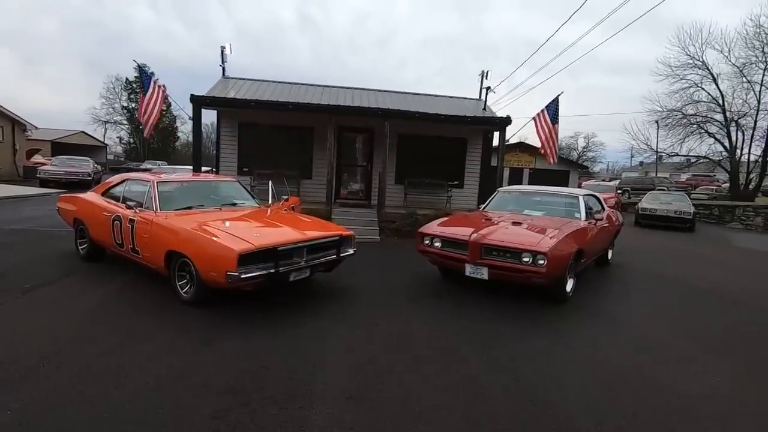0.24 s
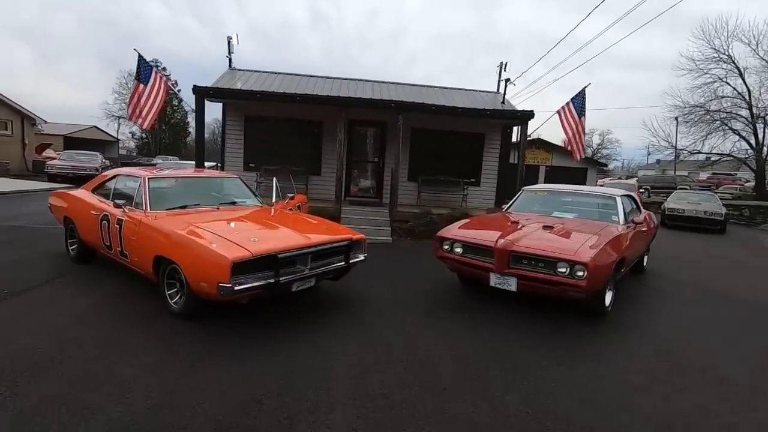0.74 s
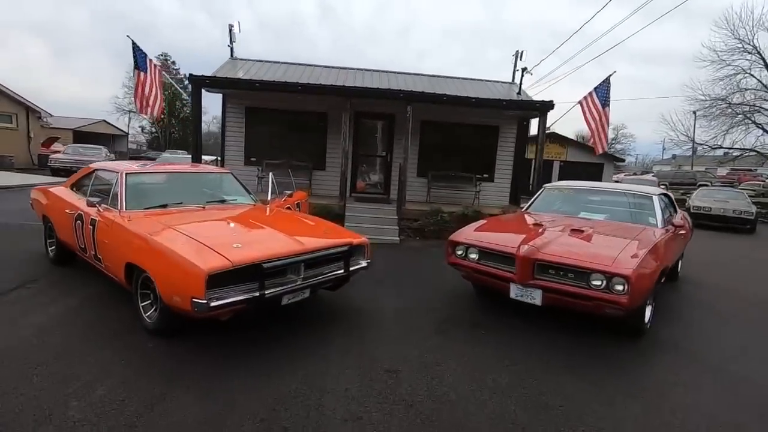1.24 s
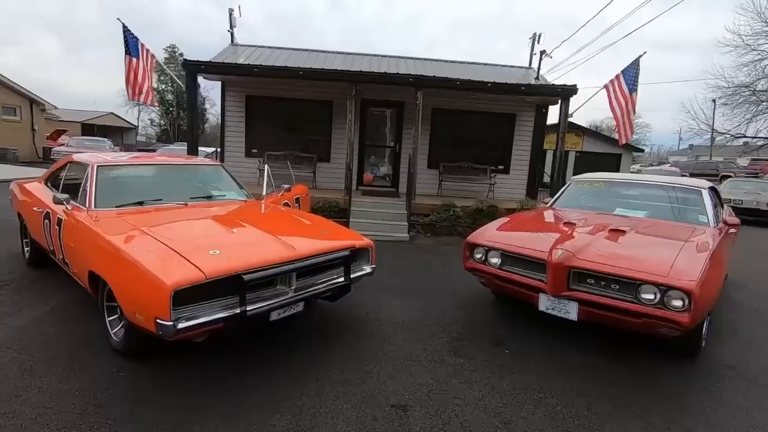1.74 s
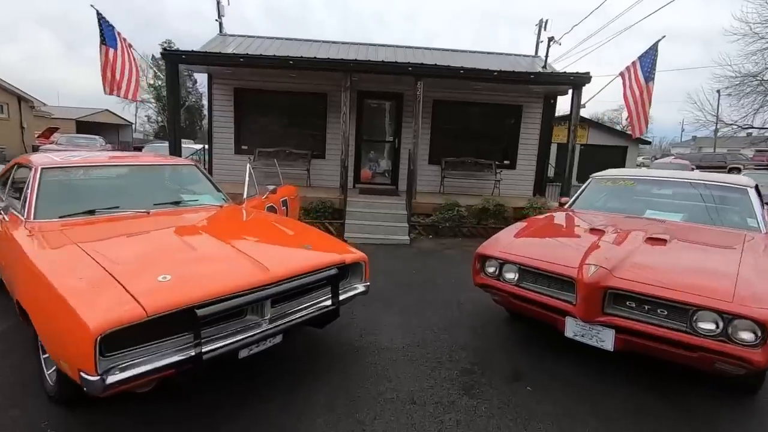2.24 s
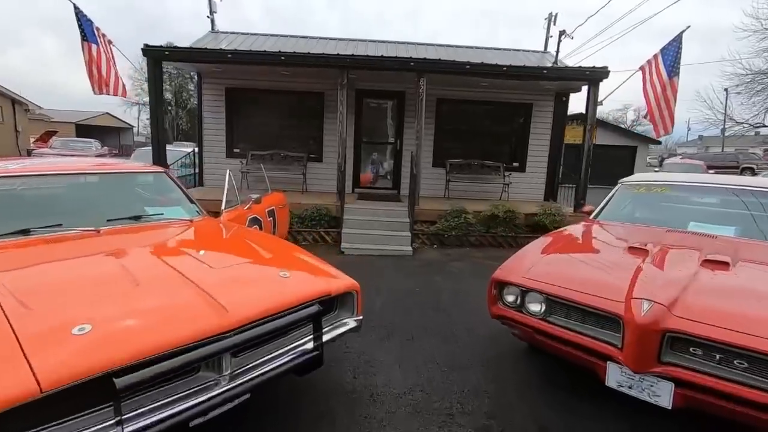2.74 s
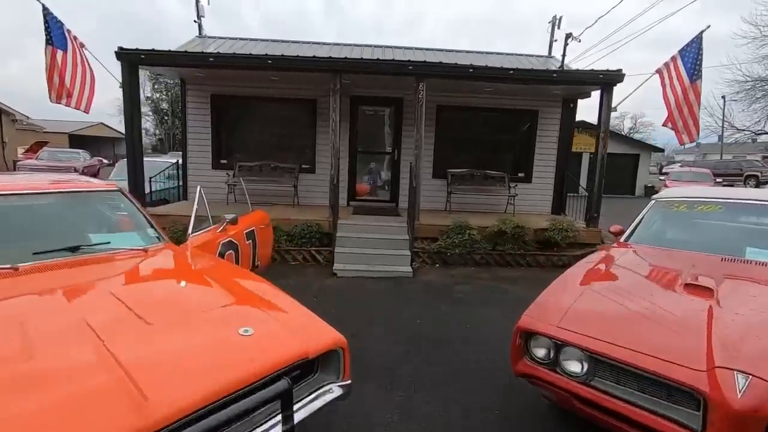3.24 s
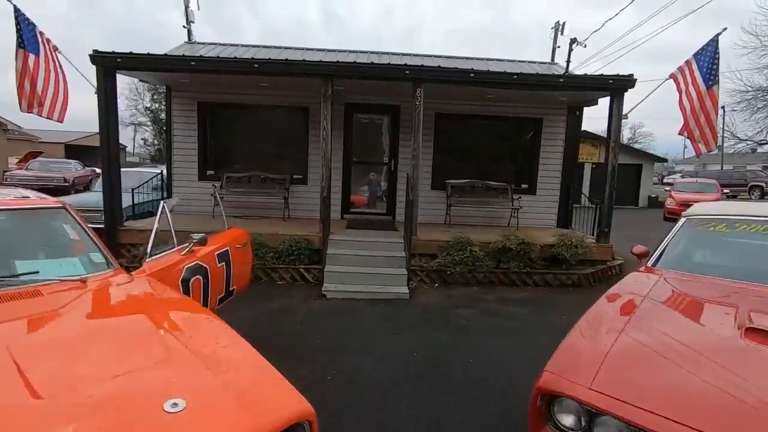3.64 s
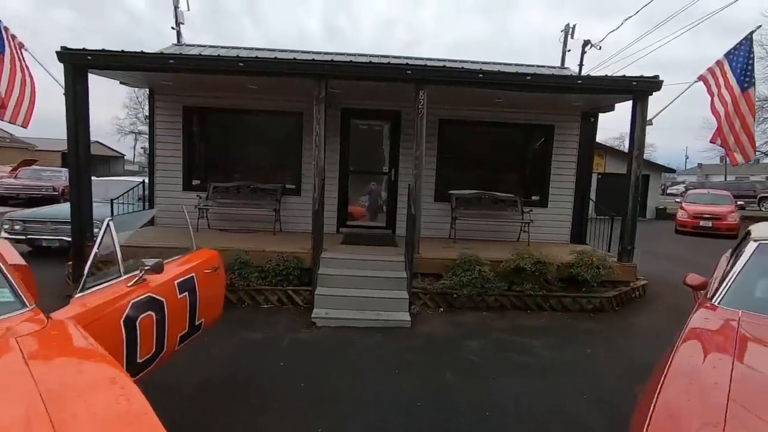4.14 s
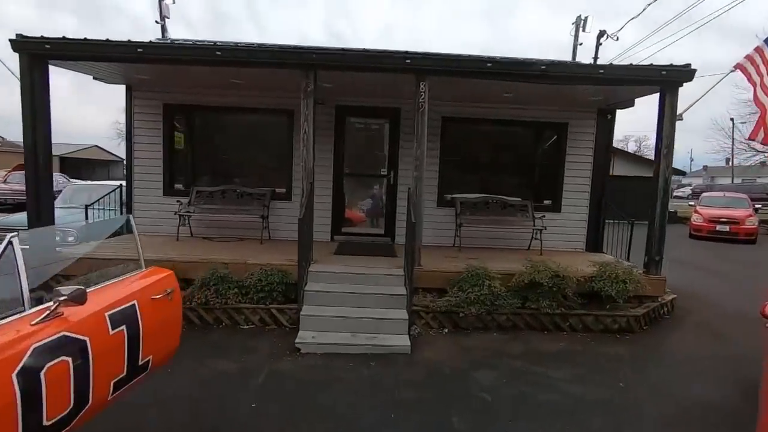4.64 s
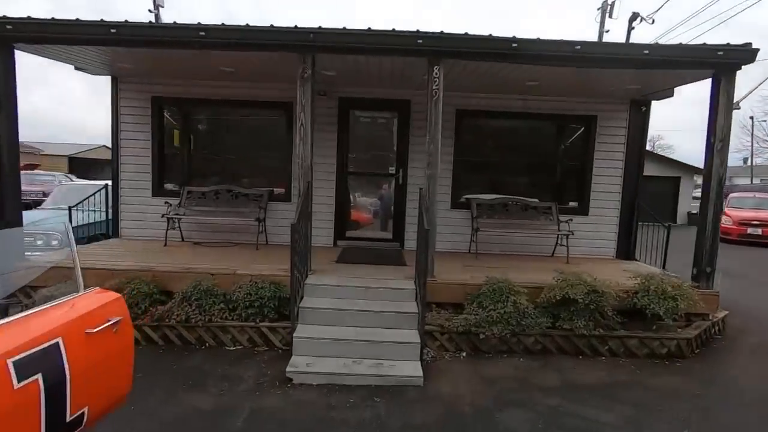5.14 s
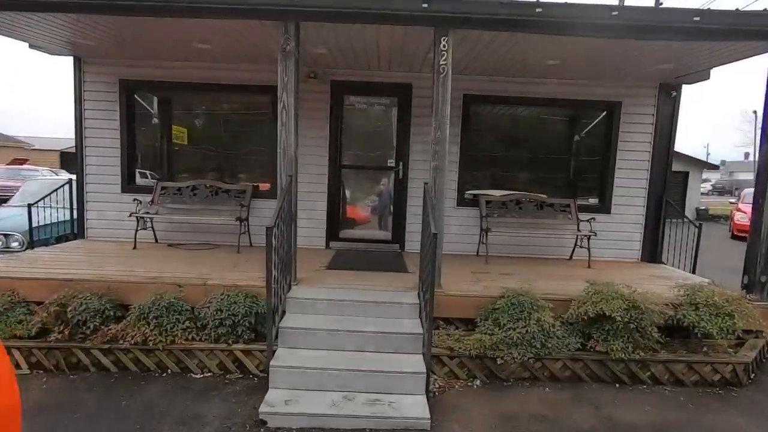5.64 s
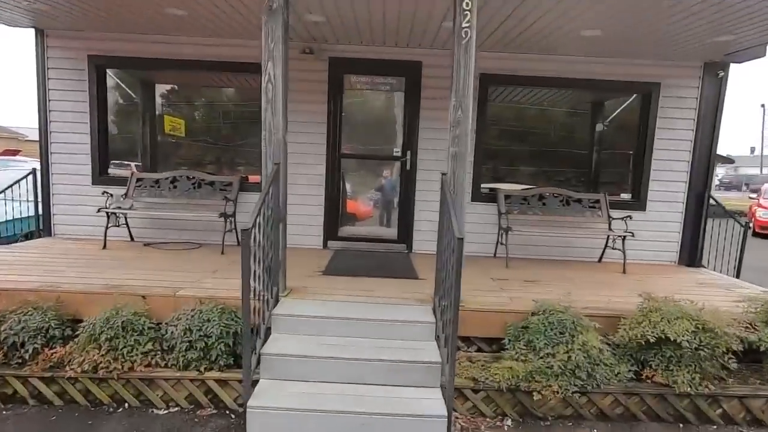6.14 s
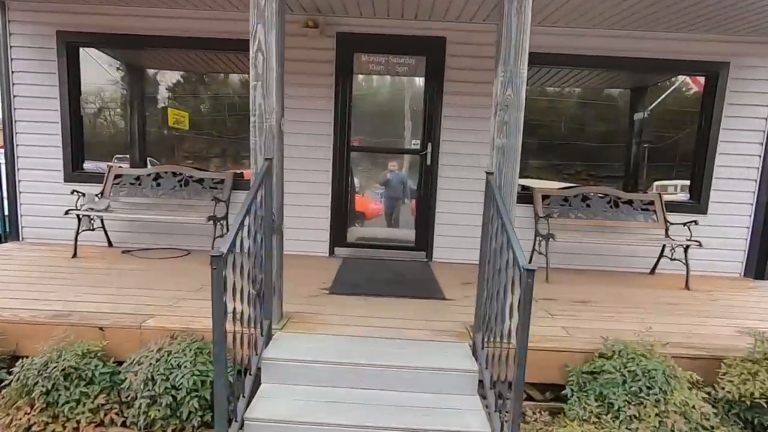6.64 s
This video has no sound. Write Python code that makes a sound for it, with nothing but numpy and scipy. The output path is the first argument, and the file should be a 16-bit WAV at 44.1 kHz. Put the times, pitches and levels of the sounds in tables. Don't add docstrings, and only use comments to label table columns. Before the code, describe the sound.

Outdoors, a powerful car engine holds a low, bumpy idle without revving. The exhaust is a heavy, centered drone with irregular stronger and weaker beats, while quiet airy fan and valve noise hisses to both sides. It thins briefly near the start, then swells, with extra pipe ringing midway between two parked cars. Faint clicks, squeaks and distant hum; close handheld stereo pickup.

```python
import sys
import numpy as np
from scipy import signal
from scipy.io import wavfile
from scipy.ndimage import uniform_filter1d

SR = 44100
rng = np.random.default_rng(int(sys.argv[2]) if len(sys.argv) > 2 else 0)


def decibels_to_gain(level_db):
    exponent = np.asarray(level_db, float) / 20
    return 10 ** exponent


def dump(signal):
    limited = np.clip(np.atleast_2d(signal).T, -1, 1)
    pcm = np.round(limited * 32767).astype(np.int16)
    wavfile.write(sys.argv[1], SR, pcm)


N = 303849

# time in seconds, firings per second.
IDLE_SPEED = [(0, 42.9), (.74, 42.71), (.816, 43.77), (1.386, 40.24), (2.28, 41.58), (2.29, 42.25),
              (2.897, 42.57), (2.925, 41.69), (3.43, 42.16), (3.45, 42.7), (3.603, 43.04), (3.967, 45.45),
              (4.456, 42.36), (4.687, 43.54), (5.768, 43.24), (5.791, 42.32), (5.991, 42.73), (6.89, 42.13)]
# time in seconds, exhaust level in dB, detour of the echo off car
# and wall in metres, echo strength 0-1, unevenness of the firings in dB.
WALK = [(0, -25.5, 1.6, 0, 3), (.45, -22.5, 2.5, 0.4, 0.5), (.85, -21.5, 2.35, 0.28, 0.5),
        (1.07, -24, 2.76, 0.85, -5), (1.15, -27.5, 1.24, 0.35, -3.5), (1.55, -29, 1.29, 0.5, 5),
        (1.95, -28, 0.84, 0.38, 3.5), (2.3, -22.5, 2.36, 0.3, 2.5), (2.7, -23, 2.52, 1, 2.5),
        (3.1, -23, 2.51, 0.32, 1), (3.5, -21, 2.54, 0.57, 1), (3.85, -21, 2.38, 0.88, 3.5),
        (4.3, -22, 2.67, 0.4, -0.5), (4.8, -22, 3.14, 0.45, -5), (5.2, -23.5, 3.36, 0.41, -7),
        (5.7, -24.5, 4.05, 0.37, -4), (6.3, -22.5, 4.03, 0.17, -1), (6.89, -23.5, 4.07, 0.45, -3.5)]
# time in seconds, level in dB, brightness in dB per group,
# stereo width 0-1.
NEARNESS = [(0, -49, 0.5, 0.7), (.35, -49, 0.1, .6), (.75, -48, 1, .6), (1.1, -47.5, -0.5, .5),
            (1.5, -46, .3, .4), (1.9, -45.5, 0, 0.5), (2.3, -45.5, 0.1, 0.3), (2.75, -47, 0.66, .4),
            (3.2, -47, .5, 0.5), (3.7, -49, 1, .7), (4.2, -49.5, 1, 0.8), (4.55, -47.5, -0.6, 0.5),
            (5.0, -51, -1, 0.5), (5.3, -50, -0.5, 0.4), (5.9, -49, 0.1, 0.6), (6.3, -53, 1, 0.5),
            (6.89, -53, 1.5, 0.7)]
# time in seconds, pitch in Hz, level in dB.
FAR_HUM = [(0, 484, -64), (.4, 484, -66), (.5, 484, -58), (.65, 483, -63), (1.4, 476, -61),
           (1.55, 476, -70), (1.7, 478, -60), (2.3, 478, -80), (6.89, 478, -80)]
# time in seconds, pitch in Hz, peak in dB, length in seconds.
SQUEAKS = [
    (.341, 900, -31, 0.001),
    (1.7125, 3550, -40, 0.0025),
    (6.083, 5370, -59, .005),
    (6.217, 5430, -59, .008),
    (6.221, 4220, -56, 0.006),
]
# time in seconds, peak in dB.
TICKS = [
    (1.4426, -32.5),
    (1.4504, -39),
    (1.464, -50),
    (4.352, -49),
]
# frequency in Hz, level in dB per Hz.
BAY_COLOUR = [(330, -11), (400, -11), (520, -10), (720, -6), (860, -10.5), (1500, -12.5), (1850, -18),
              (4760, -28.5), (7900, -34.5), (8750, -38), (9800, -37), (10800, -51.5), (11800, -52),
              (14000, -54)]
# frequency in Hz, likeness 0-1.
LIKENESS = [(330, 0.97), (420, 0.93), (600, 0.81), (1100, 0.4), (2400, 0.58), (3500, 0.8), (4800, 0.66),
            (5600, 0.39), (7500, 0.074), (10500, 0.16)]
# frequency in Hz, left minus right in dB.
LEAN = [(330, -0.5), (600, 0.4), (1050, -2.5), (1900, -0.3), (3300, 1), (5000, -0.5), (6000, -2),
        (10400, 0)]
# dB against the bay level, for drone, roar, rush and sizzle.
GROUP_DB = [0.9, -0.9, -4, -13.5]
# time in seconds, half length in seconds,
# gain in dB.
FAN_ROAR = [
    (.6, 1, 3),
    (2.7, 0.74, -2),
    (3.55, 0.25, 3.5),
    (4.0, 0.38, 4.5),
]
# pitch in Hz, width in Hz, level in dB.
LOW_PIPES = [(59.4, 39, -6), (84, 29, -7), (101.6, 18, -0.5)]
MID_PIPES = [(140, 30, 0), (161.8, 34, -4), (184.7, 21, -2)]
HIGH_PIPES = [(227, 45, -1), (246.2, 39, -5), (275.4, 24, -3.5), (298, 26, -8), (352.7, 27, -9),
              (394, 27, -15)]
# level in dB, for the middle and the high pipes.
BURBLE_DB = [-33.5, -48]
# time in seconds, half length in seconds, gain in dB.
BETWEEN_CARS = [
    (3.6, 0.87, 7),
]
# time in seconds, pressure surplus (0-1 scale) in the main pipe,
# the same in the muffler.
WEAK_FIRINGS = [(0.165, -0.067, -0.006), (0.516, -0.053, -0.018), (0.539, -0.067, -0.014),
                (1.761, -0.055, -0.018), (2.102, -0.054, -0.027), (2.247, -0.079, 0.007),
                (2.319, -0.08, -0.005), (2.46, -0.076, -0.019), (2.79, -0.074, -0.009),
                (2.837, -0.094, -0.018), (3.55, -0.085, -0.038), (3.597, -0.061, 0.012),
                (3.757, -0.084, -0.011), (3.892, -0.07, -0.02), (3.915, -0.079, -0.043),
                (4.205, -0.073, -0.019), (4.25, -0.084, -0.005), (4.483, -0.137, -0.029),
                (4.507, -0.054, -0.019), (4.991, -0.084, -0.009), (5.037, -0.062, -0.02),
                (5.06, -0.053, -0.009), (5.221, -0.071, -0.012), (5.591, -0.09, -0.02),
                (5.614, -0.086, 0.002), (5.729, -0.094, -0.003), (6.175, -0.084, -0.015),
                (6.339, -0.091, -0.011), (6.717, -0.108, -0.009), (6.741, -0.063, -0.006)]
STRONG_FIRINGS = [(0.119, 0.064, 0.007), (0.259, 0.07, 0.025), (0.68, 0.049, -0.001),
                  (1.834, 0.067, -0.005), (2.174, 0.054, 0.041), (2.39, 0.053, 0.044), (2.602, 0.064, 0.0),
                  (2.98, 0.086, 0.02), (3.123, 0.055, 0.013), (3.361, 0.084, 0.032), (3.48, 0.057, -0.0),
                  (3.503, 0.078, 0.046), (3.735, 0.06, 0.022), (4.159, 0.074, 0.003), (4.227, 0.055, 0.004),
                  (4.413, 0.045, 0.029), (5.337, 0.059, 0.004), (5.94, 0.063, 0.011), (6.057, 0.07, 0.017),
                  (6.081, 0.085, 0.006), (6.316, 0.06, 0.004)]
ORDER_LAG = [0.0, -.65, 2.8, -3.0, -2.4, -1.0, -1.9]
# level in dB at mean idle, dB gained per extra firing a second.
STRONG_ORDERS = [(0.5, -2.5), (5.1, 0.9), (-5.5, -0.5), (-12, -2.5)]
# time in seconds, half length in seconds, gain in dB.
SIXTH_HEARD = [
    (.5, 0.27, 10.5),
    (3.95, 0.24, 4.5),
]
# time in seconds, half length in seconds, gain in dB.
SIDE_PIPE = [
    (1.25, 0.27, 17.5),
    (1.9, 0.34, 10.5),
    (2.6, 0.56, 18.5),
    (3.45, 0.45, 19.5),
    (6.4, 0.21, 8),
]

T = np.arange(N) / SR
PASSING_S = (3.0, 3.3)
MEAN_IDLE_HZ = 42.5
# pitch (Hz), swell time (s), onset against the firing (s)
MAIN_PIPE = (98.0, 0.025, -0.016)
MUFFLER = (138.0, 0.02, -0.016)


def rms_one(x):
    return x / np.sqrt(np.mean(x ** 2) + 1e-20)


def in_time(rows):
    s, *columns = np.transpose(rows)
    return [np.interp(T, s, column) for column in columns]


def at_hz(rows, hz):
    points, values = np.transpose(rows)
    return np.interp(np.log(hz), np.log(points), values)


def swells(rows):
    return sum(db * np.exp(-((T - s) / half) ** 2) for s, half, db in rows)


def drift(rate):
    step = 40
    r = np.exp(-2 * np.pi * rate * step / SR)
    noise = rng.standard_normal(N // step + 2002)
    slow = signal.lfilter([1], [1, -2 * r, r * r], noise)[2000:]
    return np.interp(np.arange(N) / step, np.arange(len(slow)), rms_one(slow))


def band_filter(x, order, hz, kind="low"):
    return signal.sosfilt(signal.butter(order, hz, kind, fs=SR, output="sos"), x)


def resonate(x, hz, width):
    r = np.exp(-np.pi * width / SR)
    feedback = [1, -2 * r * np.cos(2 * np.pi * hz / SR), r * r]
    return signal.lfilter(np.array([1, 0, -1]) * (1 - r * r) / 2, feedback, x)


def wind():
    shared, left, right = band_filter(rng.standard_normal((3, N)), 2, [12, 80], "band")
    deep = band_filter(shared, 3, 32)
    own = band_filter([left, right], 4, 110)
    lumpy = decibels_to_gain(-48.5 + 1.5 * drift(3))
    return (rms_one(own) + 2.4 * rms_one(deep)) * lumpy


def far_hum():
    hz, level_db = in_time(FAR_HUM)
    tone = np.sin(2 * np.pi * np.cumsum(hz) / SR)
    return decibels_to_gain(level_db + 1.5 * drift(5)) * tone * decibels_to_gain([[3.0], [-12.0]])


def squeaks():
    out = np.zeros(N)
    for s, hz, db, length in SQUEAKS:
        near = slice(round((s - 0.05) * SR), round((s + 0.05) * SR))
        t = T[near]
        wobble = 1 + 0.25 * drift(150)[near]
        swell = np.exp(-((t - s) / length) ** 2)
        out[near] += decibels_to_gain(db) * swell * wobble * np.sin(2 * np.pi * hz * t)
    return out


def ticks():
    kicks = np.full(N, 1e-18)
    for s, db in TICKS:
        kicks[round(s * SR)] = decibels_to_gain(db + 13.0)
    return resonate(resonate(kicks, 8100, 3500), 8200, 4000) * decibels_to_gain([[-1.2], [1.2]])


def engine_bay(count_so_far):
    level_db, bright_db, width = in_time(NEARNESS)
    levels_db = [level_db + db + (k - 1) * bright_db for k, db in enumerate(GROUP_DB)]
    levels_db[1] = levels_db[1] + swells(FAN_ROAR)
    quarter_octaves = 310 * 2 ** np.arange(0, 4.6, 1 / 4)
    edges = np.r_[quarter_octaves, 7500, 8300, 9200, 10400, 11200, 12500, 14600]
    white = rng.standard_normal((2, 2, N))
    throb = 0.4 * np.cos(np.pi * count_so_far / 4 + 1.1) + 0.72 * drift(19)
    groups = np.zeros((4, 2, N))
    for k, (low, high) in enumerate(zip(edges, edges[1:])):
        mid, side = band_filter(white[k % 2], 3, [low, high], "band")
        hz = np.sqrt(low * high)
        group = np.searchsorted([875, 1750, 4950], hz)
        apart = np.clip((1 - at_hz(LIKENESS, hz)) * width / 0.58, 0.001, 1.5)
        if 3000 < hz < 5300:
            apart = apart * np.interp(T, PASSING_S, [0.06, 1.6])
        throb_db = [0.2, 0.3, 0.7, 1.6][group] * throb
        gain = decibels_to_gain(at_hz(BAY_COLOUR, hz) + throb_db + 0.93 * drift(4.3))
        if 8300 < hz < 9200:
            gain = gain * decibels_to_gain(np.interp(T, PASSING_S, [-4, 1]))
        lean = decibels_to_gain(at_hz(LEAN, hz) / 2 * np.array([[1], [-1]]))
        stereo = np.sqrt(2 - apart) * mid + np.sqrt(apart) * side * [[1], [-1]]
        groups[group] += gain * lean * stereo
    return sum(decibels_to_gain(db) * g / np.std(g.mean(axis=0)) for db, g in zip(levels_db, groups))


def burble(firings, pipes, level_db):
    out = 0
    for hz, width, db in pipes:
        kicks = np.full(N, 1e-18)
        kicks[firings] = rng.standard_normal(size=400)[:len(firings)]
        ringing = resonate(resonate(kicks, hz, width * 1.26), hz, width * 1.26)
        out = out + decibels_to_gain(db) * rms_one(ringing)
    return decibels_to_gain(level_db) * rms_one(out)


def lope(firings, s, surplus, pipe):
    hz, swell, onset = pipe
    nearest = firings[np.abs(firings - s[:, None] * SR).argmin(axis=1)]
    kicks = np.zeros(N)
    kicks[np.clip(nearest + round(onset * SR), 0, N - 1)] = surplus
    t = np.arange(SR // 4) / SR
    ring = t / swell * np.exp(1 - t / swell) * np.cos(2 * np.pi * hz * t)
    return signal.fftconvolve(kicks, ring)[:N]


def order_levels(per_s, side_db):
    level_db, detour, echo, _ = in_time(WALK)
    per_s = uniform_filter1d(per_s, size=SR // 6)
    turn = 2 * np.pi * per_s * detour / 343
    echo = np.clip(echo, 0, 0.95)
    levels = []
    for k, (db, slope) in enumerate(STRONG_ORDERS):
        echo_db = 10 * np.log10(1 + echo ** 2 + 2 * echo * np.cos((k + 1) * turn))
        levels.append(level_db + db + slope * (per_s - MEAN_IDLE_HZ) + echo_db)
    fifth, sixth, seventh = [db + 2.5 * drift(1.1) for db in (-47, -54, -62.5)]
    return levels + [fifth, sixth + swells(SIXTH_HEARD), seventh + side_db]


def orders(count_so_far, levels_db):
    turn = 2 * np.pi * count_so_far
    tones = [decibels_to_gain(db) * np.cos((k + 1) * turn + ORDER_LAG[k]) for k, db in enumerate(levels_db)]
    return np.sqrt(2) * sum(tones)


def exhaust(per_s, count_so_far):
    *_, uneven_db = in_time(WALK)
    middle_db, high_db = BURBLE_DB
    firings = np.flatnonzero(np.diff(np.floor(count_so_far)))
    out = orders(count_so_far, order_levels(per_s, swells(SIDE_PIPE))) * decibels_to_gain(0.17 * drift(9.6))
    s, main, muffler = np.transpose(WEAK_FIRINGS + STRONG_FIRINGS)
    out += 1.34 * lope(firings, s, main, MAIN_PIPE)
    out += 1.1 * lope(firings, s, muffler, MUFFLER)
    out += burble(firings, LOW_PIPES, -33.5 + 0.51 * uneven_db)
    out += burble(firings, MID_PIPES, middle_db + uneven_db)
    out += burble(firings, HIGH_PIPES, high_db + 0.67 * T + swells(BETWEEN_CARS))
    deep = band_filter(out, 2, 110)
    return out + 0.036 * deep * [[1], [-1]]


def scene():
    per_s, = in_time(IDLE_SPEED)
    count_so_far = np.cumsum(per_s) / SR - 0.108
    car = exhaust(per_s, count_so_far) + engine_bay(count_so_far)
    return car + ticks() + squeaks() + far_hum() + wind()


def roll_off(x):
    return signal.sosfilt(signal.butter(12, 14600, fs=SR, output="sos"), x)


def record(dry):
    return roll_off(np.tanh(1.031 * dry))


dry = scene()
out = record(dry)
dump(out)
```